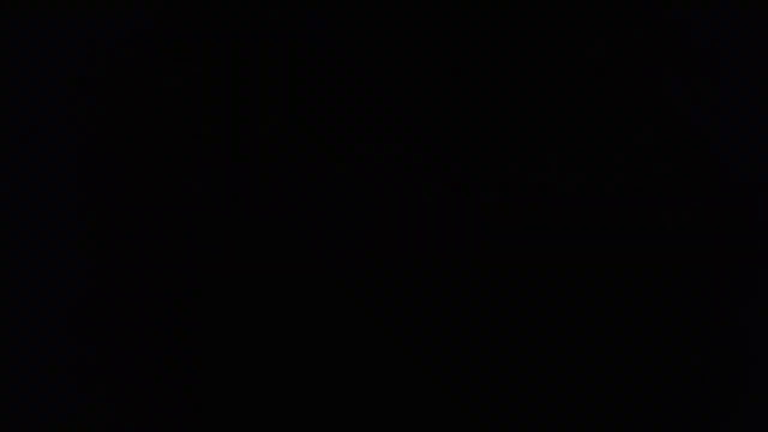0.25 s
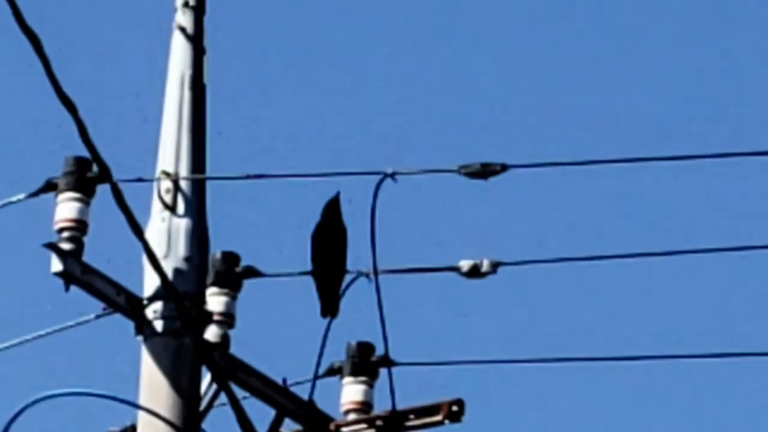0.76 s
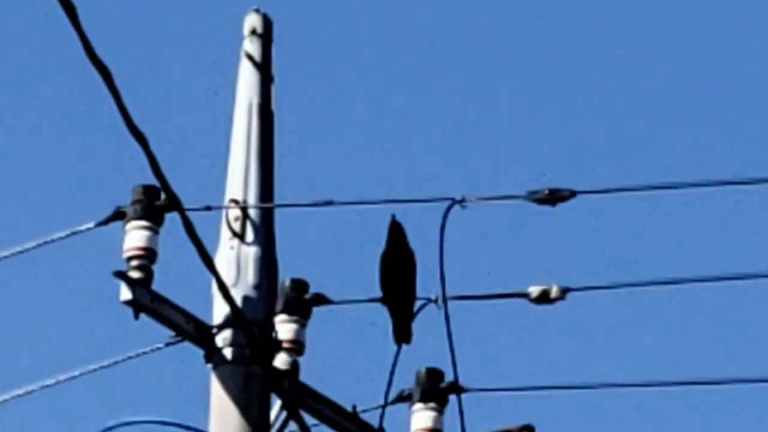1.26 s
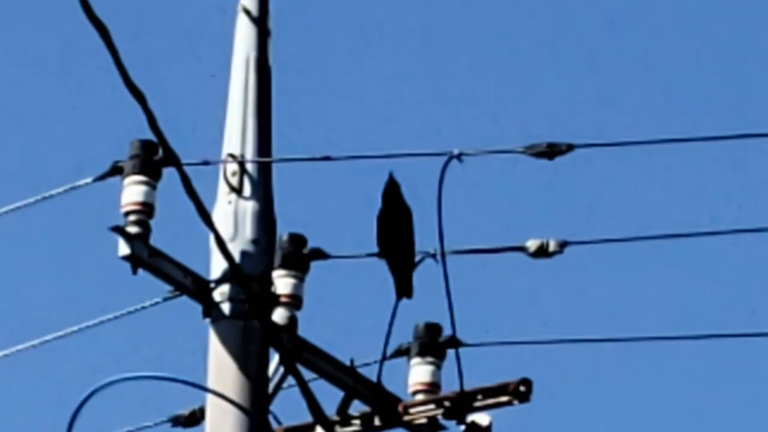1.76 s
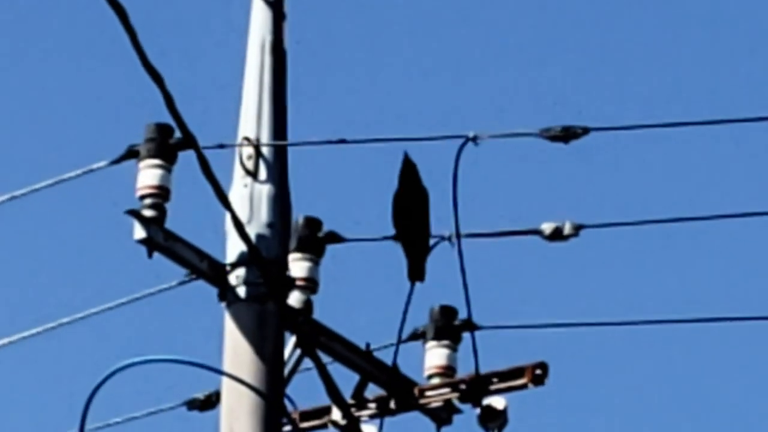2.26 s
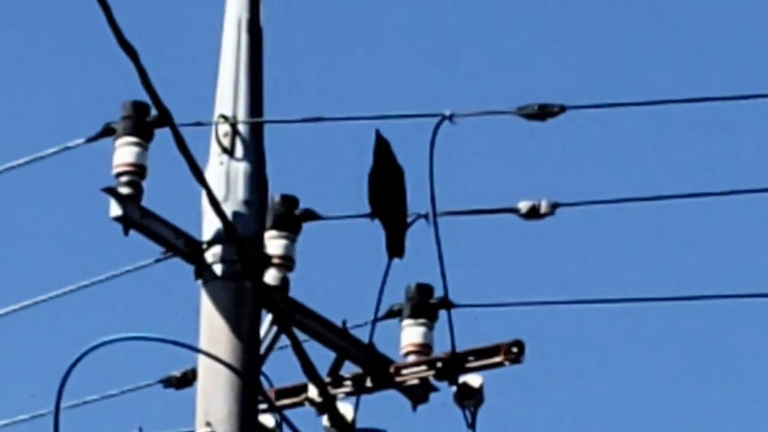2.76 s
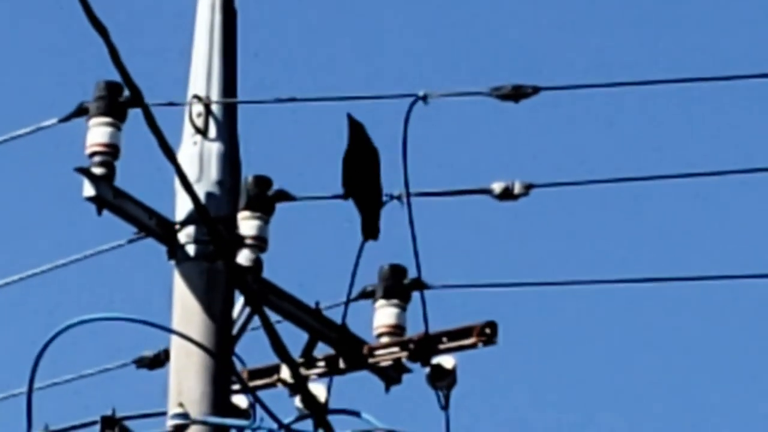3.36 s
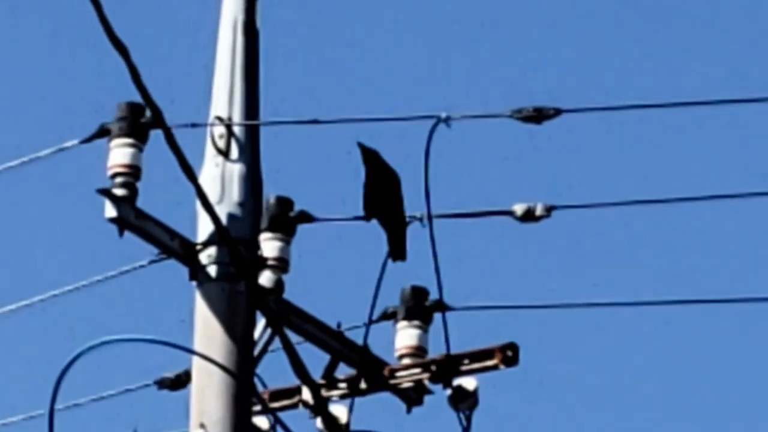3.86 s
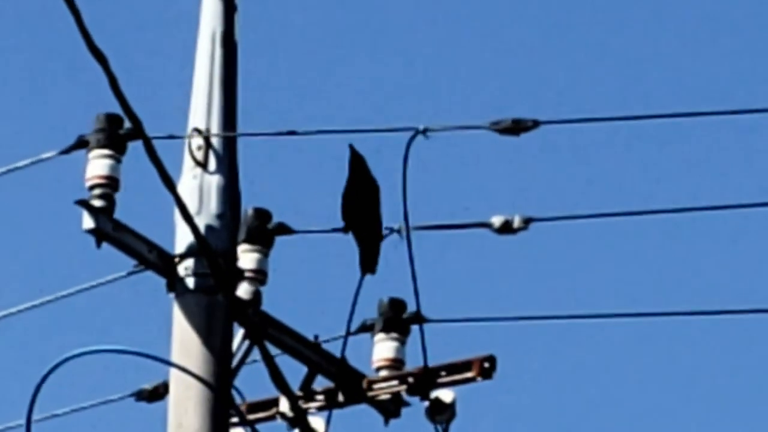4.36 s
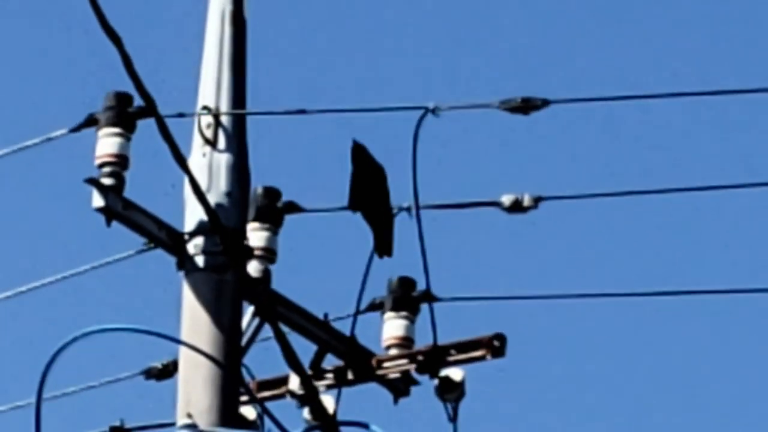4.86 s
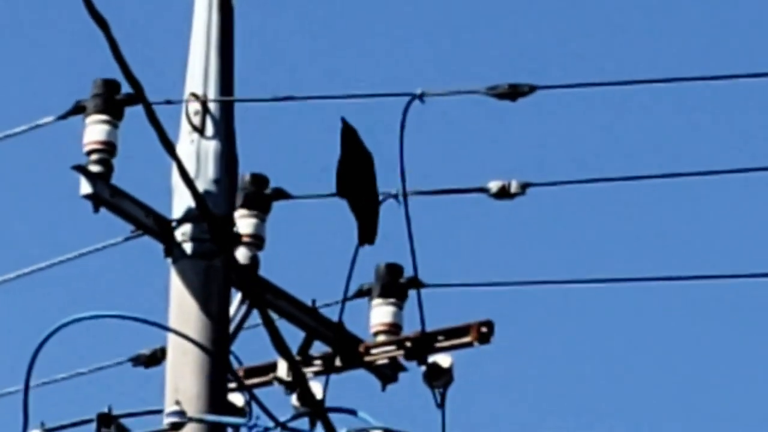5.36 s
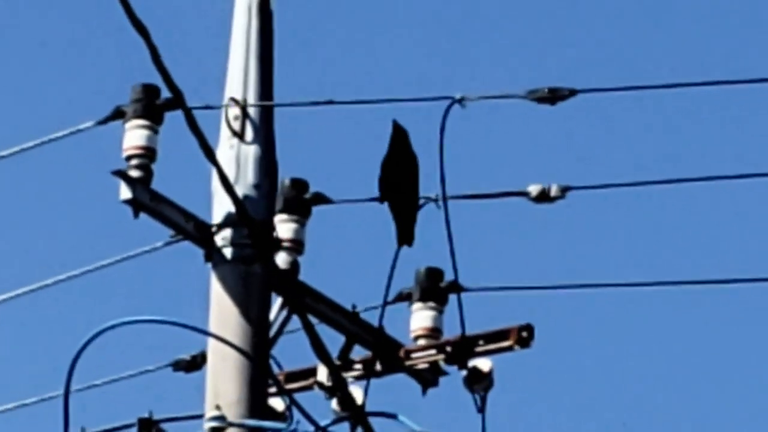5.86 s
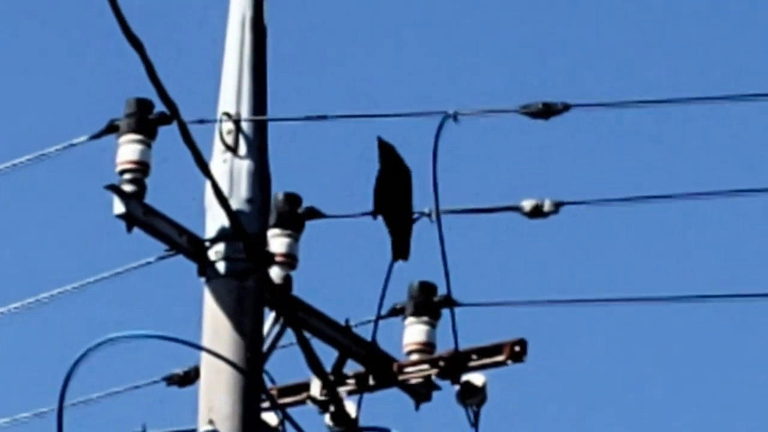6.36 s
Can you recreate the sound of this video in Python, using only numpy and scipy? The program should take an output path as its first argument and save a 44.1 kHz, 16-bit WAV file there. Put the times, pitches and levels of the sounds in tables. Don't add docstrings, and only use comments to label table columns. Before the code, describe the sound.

After a brief low rumble and tiny distant croaks, a crow caws hoarsely seven times above a street, the last call faint.

```python
import sys
import numpy as np
from scipy import signal
from scipy.fft import rfft, irfft
from scipy.io import wavfile
from scipy.ndimage import uniform_filter1d

SR = 44100
rng = np.random.default_rng(int(sys.argv[2]) if len(sys.argv) > 2 else 0)


def attenuation_scalar(level_db):
    decades = np.asarray(level_db, float) / 20
    return 10 ** decades


def inscribe(sig):
    pcm = np.round(np.clip(np.atleast_2d(sig).T, -1, 1) * 32767)
    wavfile.write(sys.argv[1], SR, pcm.astype(np.int16))


N = 291368

# (frequency [Hz], level per Hz [dB])
STILL_AIR = [(13, -32), (22, -11.5), (76, -4.5), (121, -28), (172, -19.5), (197, -28), (403, -37),
             (1550, -41.5), (1820, -42.5), (2270, -42.5), (8700, -57), (15500, -42)]
STREET_AIR = [(13, -59), (22, -3), (92, -9.5), (172, -16.5), (203, -10), (233, -16), (450, -24),
              (576, -28.5), (737, -29.5), (996, -31), (1380, -33.5), (2090, -36.5), (9450, -46.5),
              (15500, -33)]
# (frequency [Hz], likeness [-1 to 1])
LIKENESS = [(60, 0.96), (180, 0.87), (550, 0.59), (1650, -0.07), (4970, -0.12), (15000, 0.026)]
# (frequency [Hz], difference [dB])
BACKGROUND_SIDE = [(60, 3), (180, 3), (550, 2), (1650, 1.5), (4970, 0), (15000, 0)]
# (time [s], level [dB])
TRAFFIC_SWELL = [(0.6, -72.5), (1.1, -70), (1.7, -67.5), (2.4, -70), (3.1, -67.5), (3.9, -69), (4.7, -73.5),
                 (5.3, -67.5), (5.9, -69), (6.61, -72.5)]
# (middle [s], length [s], level [dB])
ENGINE_SWELLS = [(0.77, 0.12, -59), (1.087, .4, -61), (1.541, 0.18, -67.5), (2.556, 0.56, -62),
                 (2.988, 0.26, -62.5), (3.396, 0.41, -63), (3.928, 0.37, -65), (4.298, 0.34, -72.5),
                 (4.847, .3, -65.5), (5.2, 0.34, -65.5), (5.906, 0.38, -61), (6.345, 0.48, -62)]
# (start [s], length [s], peak [dB], centre [Hz], width [Hz])
FAR_CROAKS = [(0.641, 0.047, -76, 3600, 2480), (.678, 0.075, -70.5, 1130, 220),
              (0.681, 0.09, -88, 3850, 494), (0.834, .08, -86, 3700, 885), (0.833, 0.068, -92, 7500, 1164),
              (.895, 0.083, -58, 1124, 328), (0.901, .09, -77, 2760, 3120), (0.89, 0.14, -79, 7450, 2030),
              (0.923, 0.17, -83, 4030, 500), (0.966, 0.037, -65.5, 1150, 403),
              (1.079, 0.15, -80.5, 3510, 2930), (1.095, 0.27, -83.5, 7600, 1870),
              (2.598, 0.26, -76, 4330, 930), (3.278, 0.4, -80, 4100, 898), (4.72, 0.2, -78.5, 4260, 907),
              (5.055, 0.38, -70, 4840, 802), (6.56, 0.066, -81, 5000, 1980)]
# (delay [s], left gain [ratio], right gain [ratio])
HARD_ECHOES = [(.0016, -0.047, 0.2), (.0031, 0.41, -0.39), (.0058, -0.23, 0.21), (.011, -0.17, 0.23),
               (.019, 0.18, 0.69), (0.026, 0.27, -0.077), (.0009, 0.14, -0.17)]
# (frequency [Hz], time [s])
ECHO_FADE = [(400, 0.39), (1300, 0.71), (3400, 0.52), (7000, 0.39), (14000, 0.34)]
# (frequency [Hz], difference [dB])
CROW_SIDE = [(60, 5), (110, 6), (200, -4), (380, 7.5), (700, -0.5), (1290, -2.5), (2380, 0), (4400, -3.5),
             (8120, 3), (15000, -4)]
# (frequency [Hz], phase [radians])
LEFT_LEAD = [(0, 0), (1380, 0.5), (2150, 6), (3360, 4.5), (4310, 7.5), (4910, 8.5), (6120, 6.5),
             (7150, 9.0), (7410, 7), (7670, 8), (9470, 6.5), (11000, 8.5), (14000, 15), (15200, 4)]
# (frequency [Hz], width [Hz], level [dB])
FIXED_THROAT = [(1120, 280, -5), (1622, 480, -4.5), (2224, 450, -7)]
# (frequency [Hz], width [Hz], level [dB])
LOW_BEAK = (5000, 2400, -7)
HIGH_BEAK = [(7600, 2250, 0), (9900, 960, -4), (11270, 7800, -10.5)]
# (start [s], length [s], effort [dB], loudest at [share of length], widest beak [0-1])
CAW_TIMES = [
    (1.316, .45, -39.5, 0.4, 0.74),
    (2.111, 0.37, -44.5, .3, 0.84),
    (2.752, 0.41, -38.5, 0.76, 0.63),
    (3.369, .4, -42, 0.55, 0.93),
    (4.118, 0.53, -39.5, 0.29, 1),
    (5.027, 0.39, -39, 0.54, 0.71),
    (5.785, 0.38, -51, 0.56, 0.59),
]
# (rise [s], effort at start [dB], effort at end [dB],
#                     beak widest by [share of length], throat turns at [share of length])
CAW_SHAPES = [(0.053, -6, -4.5, 0.75, 0.4), (0.11, -9, -4, 1, .4), (0.052, -4.5, -4, 0.84, .6),
              (0.052, -2.5, -3, 0.87, 0.69), (0.069, -6.5, -6.5, 0.53, .5), (0.04, -11, -10.5, 1, 0.24),
              (0.054, 5, -32, 0.99, .45)]
# (time [s], frequency [Hz])
CAW_PITCHES = [
    [(1.32, 327), (1.4, 358.1), (1.5, 350.2), (1.72, 344.7), (1.77, 293)],
    [(2.12, 406.5), (2.28, 400), (2.36, 349.8), (2.49, 325.7)],
    [(2.75, 404), (3.0, 391), (3.15, 348.5)],
    [(3.37, 399.8), (3.5, 384.1), (3.6, 360.2), (3.72, 339.1), (3.78, 291)],
    [(4.12, 408.9), (4.26, 405.6), (4.42, 387), (4.56, 345.9), (4.66, 291.5)],
    [(5.03, 418.7), (5.2, 402.5), (5.3, 359.6), (5.41, 323.5)],
    [(5.79, 349), (5.9, 356.7), (5.96, 396), (6.07, 415), (6.16, 299)],
]
# (first resonance [Hz], second resonance [Hz], second over first early [dB],
#                      second over first late [dB], chest [dB])
CAW_THROATS = [(1353, 1960, 3.5, -6.5, -19.5), (1330, 1895, 2.5, 3, -11.5), (1360, 1976, 2, 1.5, -16),
               (1305, 1980, -2.5, 1.5, -15), (1345, 1990, -2, -5, -15.5), (1340, 2015, 3.5, -2.5, -17.5),
               (1290, 2016, 4.5, -3, -4.5)]
# (throbs [per s], breath at its clearest [share],
#                      clearest at [share of length], beak ring [dB])
CAW_MANNERS = [(25, .4, .4, 6), (32, .6, .3, 4.5), (42, .4, .4, 3.5), (41, .36, .22, 8),
               (57.5, .48, .35, 8), (34, .45, .4, 5), (29, .45, .45, 0)]
# (at start [dB], at end [dB])
HEAD_TURNS = [(0, 4), (0, 2), (0, 3.5), (1.999, 2), (2, 0), (0, 3.5), (0, -16)]
CHEST_CHANGES = [-2.5, -4, -6, 1, -2, 0.5, 1]


def evened(x):
    return x / np.sqrt(np.mean(x ** 2) + 1e-20)


def read(points, hz):
    f, value = np.transpose(points)
    return np.interp(np.log(hz + 1), np.log(f + 1), value)


def add(mix, s, sound):
    part = mix[..., round(s * SR):][..., :sound.shape[-1]]
    part += sound[..., :part.shape[-1]]


def wander(count, span):
    return evened(uniform_filter1d(uniform_filter1d(rng.standard_normal(count), span), span))


def resonate(x, hz, width):
    turn = np.exp(2j * np.pi * np.cumsum(hz * np.ones(len(x))) / SR)
    r = np.exp(-np.pi * width / SR)
    smooth = signal.lfilter([(1 - r) ** 2], [1, -2 * r, r * r], x / turn)
    return 2 * (turn * smooth).real


def tube(x, modes):
    out = 0
    for k, (hz, width, db) in enumerate(modes):
        out = out + (-1) ** k * attenuation_scalar(db) * resonate(x, hz, width)
    return evened(out)


def background():
    change_s, change_length_s = 0.64, 0.0093
    still_db, street_db = -62 + 0.7, -59 - 3.5
    frames, hz = N // 512 + 5, np.fft.rfftfreq(2048, 1 / SR)
    a, b, c, d, patches = rng.standard_normal((frames, 1025, 5)).T
    patches = evened(uniform_filter1d(uniform_filter1d(patches, 9, 0), 7, 1))
    same = np.clip(read(LIKENESS, hz), -1, 1)[:, None]
    left = a + 1j * b
    z = np.array([left, same * left + np.sqrt(1 - same ** 2) * (c + 1j * d)])
    side_db = read(BACKGROUND_SIDE, hz)[:, None] / 2
    z *= attenuation_scalar(np.array([side_db, -side_db]) + 1.6 * patches)
    z *= attenuation_scalar(-4.0 * (hz[:, None] / 15500) ** 8)

    def noise(colour_db):
        return evened(signal.istft(z * attenuation_scalar(colour_db), nperseg=2048, noverlap=1536)[1][:, :N])

    traffic_db = np.interp(np.arange(frames) * 512 / SR, *np.transpose(TRAFFIC_SWELL))
    in_band = np.exp(-(np.log((hz + 1) / 240) / 2.15) ** 2)[:, None]
    still = noise(read(STILL_AIR, hz)[:, None])
    street = noise(read(STREET_AIR, hz)[:, None] + in_band * (traffic_db + 73.5))
    changed = np.clip((np.arange(N) / SR - change_s) / change_length_s, 0, 1)
    return attenuation_scalar(still_db) * still * (1 - changed) + attenuation_scalar(street_db) * street * changed


def drone():
    engine_hz, third_db = 91, -14
    t = np.arange(N) / SR
    level = sum(attenuation_scalar(db) * np.exp(-(2 * (t - s) / length) ** 4) for s, length, db in ENGINE_SWELLS)
    waver = 1 + 0.0101 * wander(N, 1500) + 0.0149 * wander(N, 12000)
    turns = np.cumsum(engine_hz * waver) / SR
    tone = np.sin(2 * np.pi * turns) + attenuation_scalar(third_db) * np.sin(2 * np.pi * 3 * turns)
    side = attenuation_scalar(np.array([[1.2], [-1.2]]))
    return tone * level * attenuation_scalar(2.0 * wander(N, 1800)) * side


def scatter():
    yard_db, wait_s = -7, 0.003
    wall_s, wall_spread_s, wall_db = 0.15, 0.0044, 1.6
    taps = np.zeros((2, SR))
    at = np.arange(0, SR - 20, 20) + rng.integers(0, 20, (2, SR // 20 - 1))
    np.put_along_axis(taps, at, rng.choice([-1., 1.], at.shape), 1)
    hz, frame_s, z = signal.stft(taps, SR, nperseg=256)
    fade = attenuation_scalar(-60 * frame_s / read(ECHO_FADE, hz)[:, None])
    tail = signal.istft(z * fade, SR, nperseg=256)[1][:, :SR]
    t = np.arange(SR) / SR
    tail = tail * np.minimum(t / wait_s, 1)
    tail *= attenuation_scalar(wall_db * np.exp(-((t - wall_s) / wall_spread_s) ** 2))
    return tail * attenuation_scalar(yard_db) / np.linalg.norm(tail[0])


def outdoors(x):
    near = np.zeros((2, 2048))
    near[:, 0] = 1
    for s, left, right in HARD_ECHOES:
        near[:, round(s * SR)] += left, right
    echoes = scatter()
    add(echoes, 0, near / np.linalg.norm(near, axis=1, keepdims=True))
    heard = rfft(signal.fftconvolve(x[None], echoes, axes=1)[:, :N])
    hz = np.fft.rfftfreq(N, 1 / SR)
    port = attenuation_scalar(read(CROW_SIDE, hz) / 2) * np.exp(.5j * np.interp(hz, *np.transpose(LEFT_LEAD)))
    return irfft(heard * np.array([port, 1 / port]), N)


def faint(s, length, db, hz, width):
    u = np.linspace(0, 1, round(length * SR))
    grain = evened(resonate(rng.standard_normal(len(u)), hz * (1.06 - 0.19 * u), width))
    return s, attenuation_scalar(db) * grain * np.minimum(u * 12, 1) * (1 - u ** 1.76)


def membrane(hz, hoarse, flutter):
    n = len(hz)
    snap_share, snap_db = 0.3, 5
    beats = np.cumsum(flutter * (1 + 0.2456 * wander(n, 900))) / SR
    throb = np.cos(2 * np.pi * beats)
    snap = uniform_filter1d(np.exp(-(beats % 1) / snap_share), size=40)
    wobble = 0.018 * throb + .05 * hoarse * wander(n, 200) + .012 * wander(n, 700)
    turns = np.cumsum(hz * (1 + wobble)) / SR
    pulses = evened(sum(np.cos(2 * np.pi * k * turns) for k in range(1, 36)))
    pulses = pulses * attenuation_scalar(1.6 * hoarse * np.tanh(wander(n, 90)))
    puffs = evened((0.12 + np.exp(-(turns % 1) / 0.48)) * rng.standard_normal(n))
    swell = attenuation_scalar(snap_db * snap + 2.36 * np.tanh(wander(n, 400)))
    voice = evened(swell * (np.sqrt(1 - hoarse) * pulses + np.sqrt(hoarse) * puffs))
    rasp = evened(swell * (0.48 * pulses + puffs))
    return voice, rasp


def throat_tube(voice, first_hz, second_hz, tilt_db):
    n = len(voice)
    first_hz = first_hz * (1 + 0.03 * wander(n, 1500))
    second_hz = second_hz * (1 + 0.03 * wander(n, 1500))
    tilt_db = tilt_db + 2.5 * wander(n, 1200)
    low, middle, high = FIXED_THROAT
    first, second = (first_hz, 200, -tilt_db / 2), (second_hz, 260, tilt_db / 2)
    return tube(voice, [low, first, middle, second, high])


def upper_tube(voice, third_hz, upper_db):
    top_db = 0.5 + 1.07 * upper_db
    return tube(voice, [(third_hz, 300, 0), (3050, 400, top_db), (3600, 600, top_db - 11.5)])


def beak_tube(rasp, ring_db):
    beak = tube(rasp, [LOW_BEAK, (6250, 500, ring_db)] + HIGH_BEAK)
    return signal.sosfilt(signal.butter(6, 11800, fs=SR, output="sos"), beak)


def caw(row, shape, pitch, throat, manner, facing_db, chest_end_db):
    start, length, top_effort_db, loudest, widest = row
    rise_s, start_db, end_db, open_by, turn_at = shape
    first_hz, second_hz, early_db, late_db, chest_db = throat
    flutter, clearest, clear_at, ring_db = manner
    t = np.arange(0, length, 1 / SR)
    u = t / length

    before, after = start_db * (1 - u / loudest) ** 2, end_db * ((u - loudest) / (1 - loudest)) ** 2
    slack_db = np.where(u < loudest, before, after)
    onset_db = -15 * np.maximum(1 - t / rise_s, 0) ** 2
    fall_db = -21 * np.maximum(1 - (length - t) / 0.048, 0) ** 2
    effort_db = top_effort_db + slack_db + onset_db + fall_db

    gape = widest * (np.sin(np.pi / 2 * np.minimum(u / open_by, 1)) - 0.049 * u ** 6)

    def with_gape(shut, wide):
        return shut + (wide - shut) * gape

    upper_db, beak_db, third_hz = with_gape(-16.5, -4), with_gape(-27.5, -12), with_gape(2490, 2781)
    dull_db = 0.96 * onset_db
    chest_db = chest_db - 0.84 * slack_db + chest_end_db * u + 2.6 * wander(len(t), 500)
    tilt_db = late_db + (early_db - late_db) / (1 + np.exp((u - turn_at) / 0.015)) + dull_db
    clear = np.exp(-((u - clear_at) / np.where(u < clear_at, .2, .45)) ** 2)
    hoarse = 0.68 - (0.68 - clearest) * clear

    hz = np.interp(start + t, *np.transpose(pitch))
    voice, rasp = membrane(hz, hoarse, flutter)
    chest = evened(resonate(voice, 2 * hz, 433))
    out = throat_tube(voice, first_hz, second_hz, tilt_db)
    out = out - attenuation_scalar(chest_db) * chest
    out = out - attenuation_scalar(upper_db + dull_db) * upper_tube(voice, third_hz, upper_db)
    out = out + attenuation_scalar(beak_db + np.interp(u, [0, 1], facing_db)) * beak_tube(rasp, ring_db)
    return start, attenuation_scalar(effort_db) * out * signal.windows.tukey(len(t), .05)


def scene():
    source = np.zeros(N)
    for call in zip(CAW_TIMES, CAW_SHAPES, CAW_PITCHES, CAW_THROATS, CAW_MANNERS, HEAD_TURNS, CHEST_CHANGES):
        add(source, *caw(*call))
    for row in FAR_CROAKS:
        add(source, *faint(*row))
    return outdoors(source) + background() + drone()


def band_limit(x):
    return signal.sosfilt(signal.butter(12, 15630, fs=SR, output="sos"), x)


def record(dry):
    mix = signal.sosfilt(signal.butter(2, 34, "high", fs=SR, output="sos"), dry)
    return band_limit(mix)


dry = scene()
out = record(dry)
inscribe(out)
```